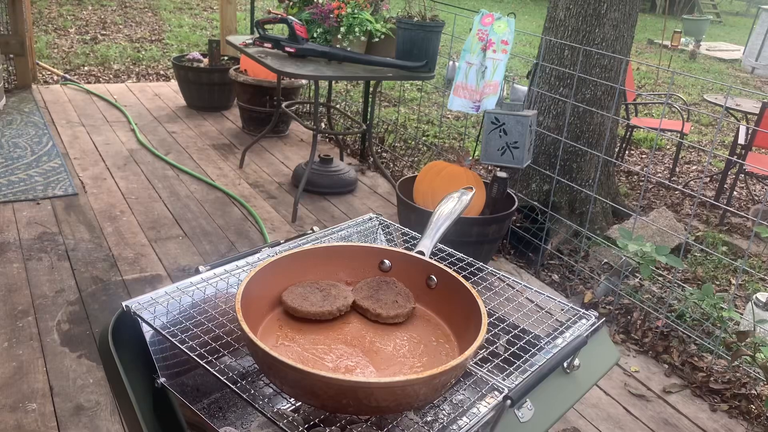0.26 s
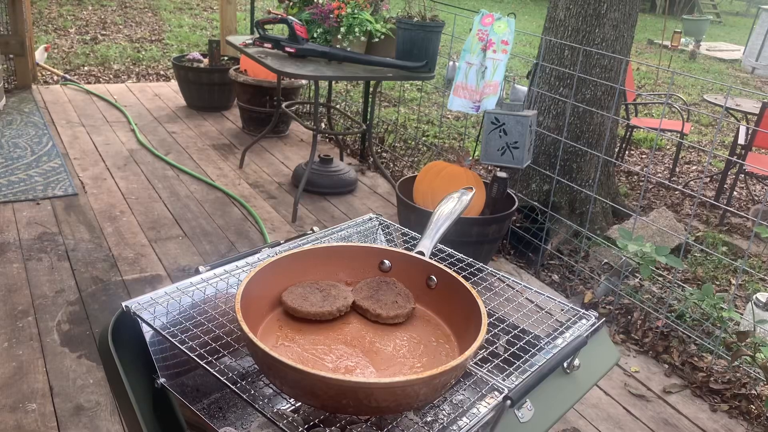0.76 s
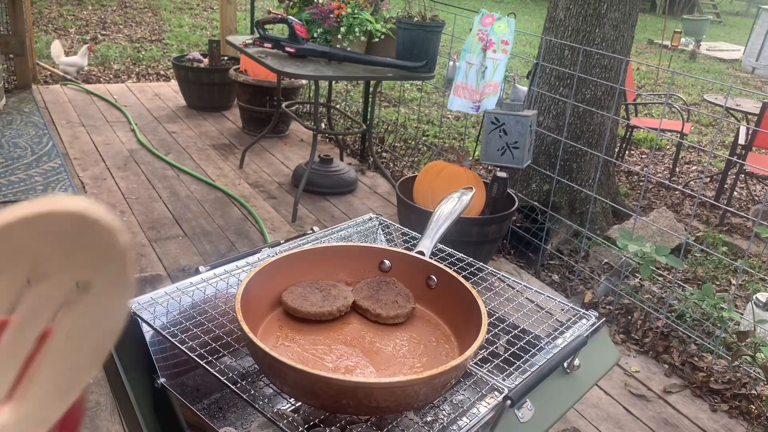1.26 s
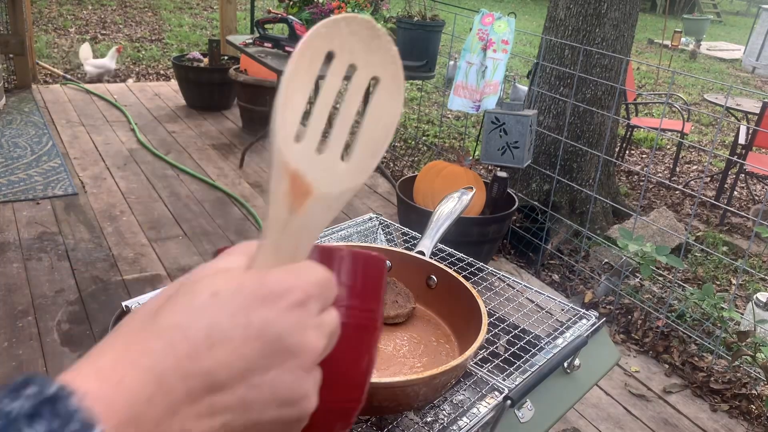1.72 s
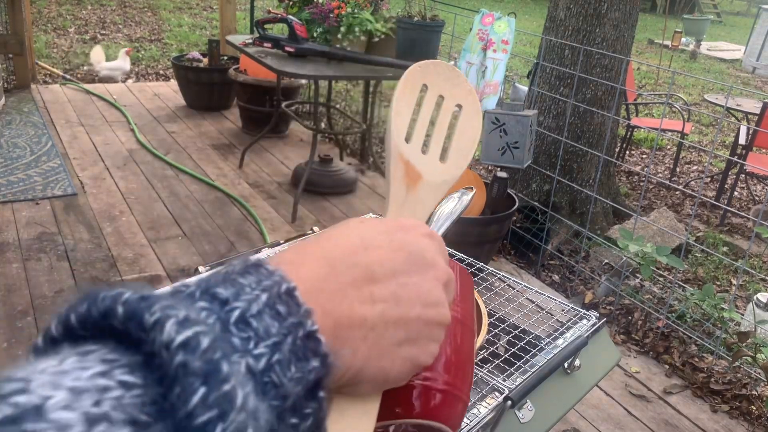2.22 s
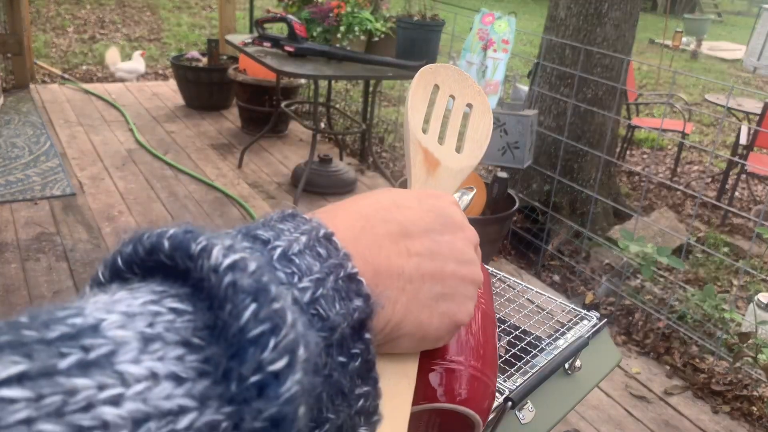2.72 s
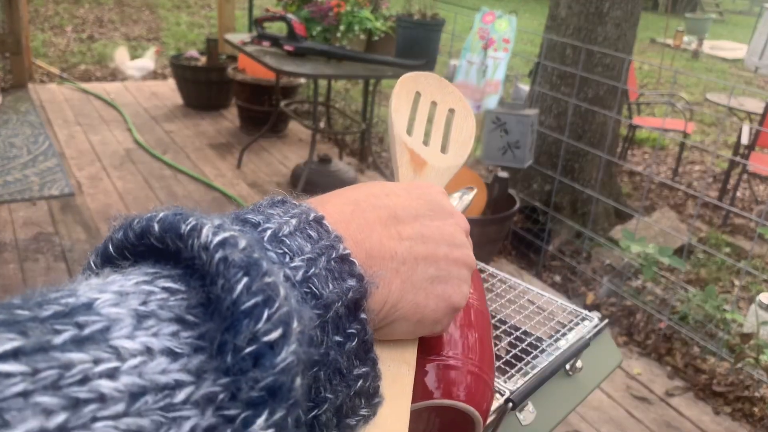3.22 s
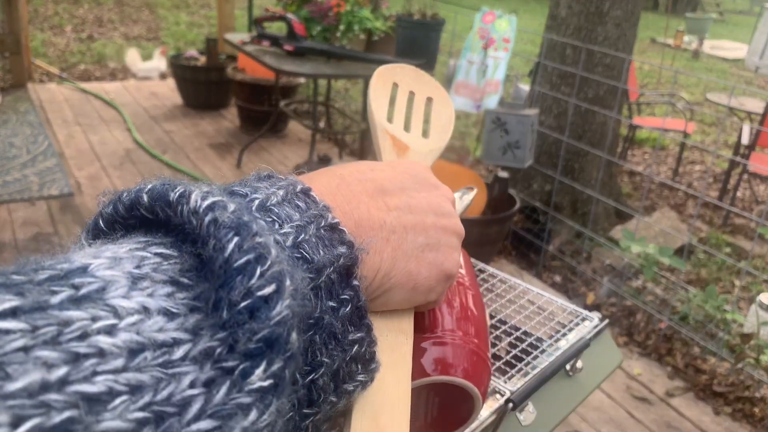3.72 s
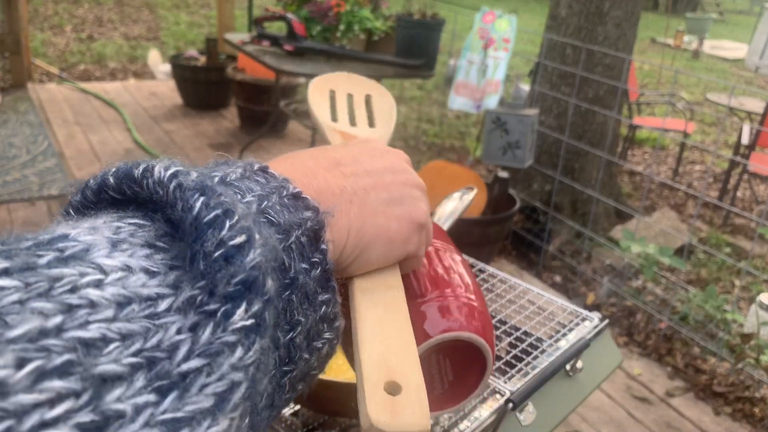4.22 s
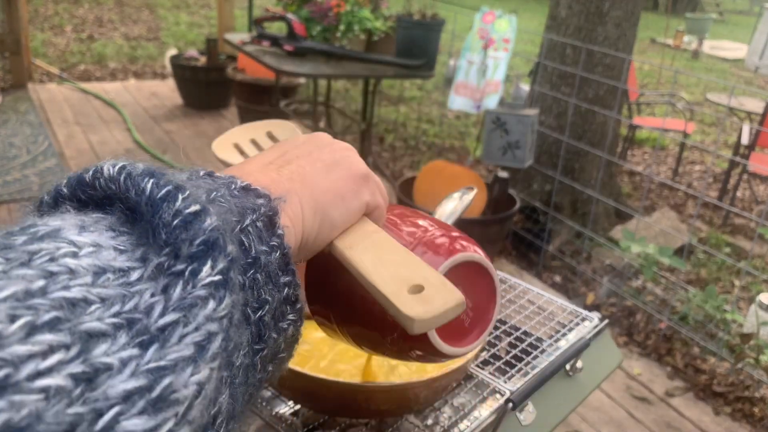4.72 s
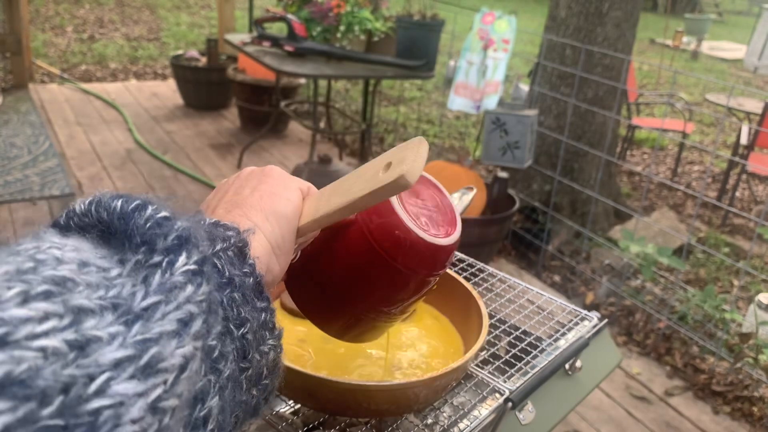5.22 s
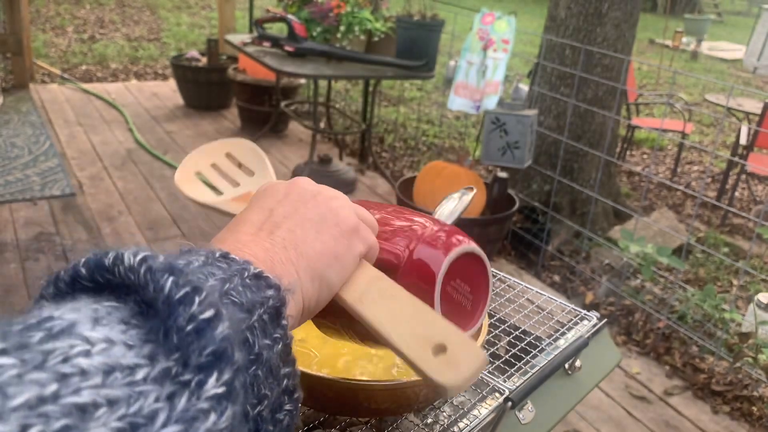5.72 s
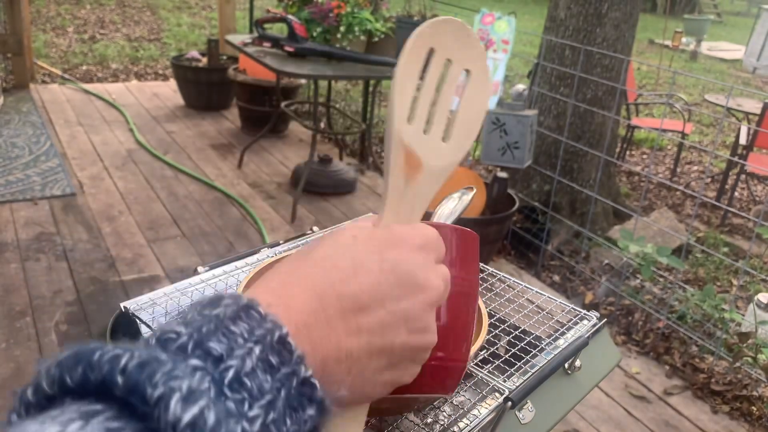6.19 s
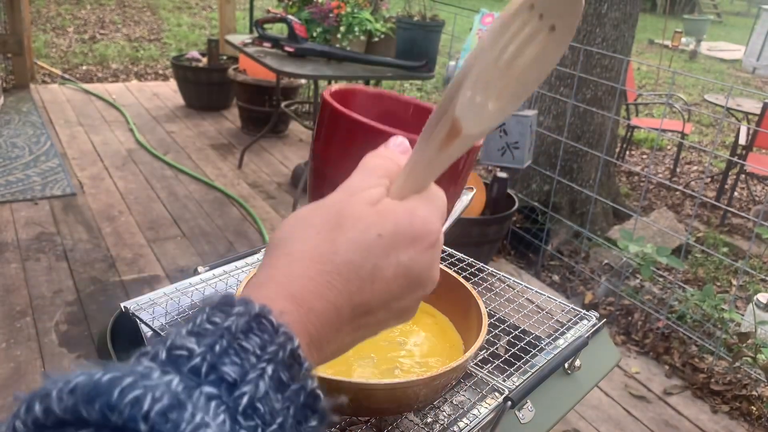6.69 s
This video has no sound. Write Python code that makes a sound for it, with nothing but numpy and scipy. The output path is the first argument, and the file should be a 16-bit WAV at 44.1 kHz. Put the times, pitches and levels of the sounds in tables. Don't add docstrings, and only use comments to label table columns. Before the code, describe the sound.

Low hen moans left and right, cutlery clatter, a spoon strike and a mug knock, then a drawn-out hoarse squawk and quick clucking outdoors.

```python
import sys
import numpy as np
from scipy import signal
from scipy.fft import rfft, irfft
from scipy.io import wavfile
from scipy.ndimage import uniform_filter1d

SR = 44100
rng = np.random.default_rng(int(sys.argv[2]) if len(sys.argv) > 2 else 0)


def magnitude_from_level(level_db):
    exponent = np.asarray(level_db, float) / 20
    return 10 ** exponent


def transcribe(u):
    v = np.clip(np.atleast_2d(u).T, -1, 1)
    q = np.round(v * 32767).astype(np.int16)
    wavfile.write(sys.argv[1], SR, q)


N = 306495
T = np.arange(N) / SR
HZ = np.fft.rfftfreq(N, 1 / SR)

# time_s, pitch_hz, level_db of the strongest partial, roughness (0-1)
LEFT_CALLS = [
    [(0, 357.5, -54, .28), (.14, 363.4, -50.5, .27), (.3, 383.4, -45.5, .1), (.37, 404.6, -49.5, .3),
     (.44, 390.3, -43, .06), (.55, 391, -45, .32), (.7, 393.3, -45, .28), (.76, 373.5, -46.5, .25),
     (.79, 376, -70, 0.35)],
    [(1.02, 342.8, -57, 0.46), (1.06, 348, -52.5, 0.12), (1.17, 350.7, -50.5, 0.24),
     (1.28, 362.5, -54, 0.43), (1.36, 365.5, -66, .4), (1.47, 370, -61, .35)],
    [(6.735, 385, -67, 0.27), (6.77, 384.7, -58, 0.16), (6.95, 394, -57, 0.22)],
]
RIGHT_CALLS = [
    [(0, 377.8, -55.5, .14), (.2, 406.4, -50, .22), (.25, 427, -42.5, 0.066), (.38, 437.1, -44.5, .08),
     (.43, 394, -40, .07), (.47, 392, -41.5, 0.096), (.5, 437.8, -45, 0.16), (.65, 428, -44.5, .13),
     (.775, 445.2, -48, .2)],
    [(1.02, 400, -56, 0.61), (1.09, 362, -53, 0.24), (1.16, 395.5, -47.5, .33), (1.22, 413, -44, .17),
     (1.3, 427.3, -43.5, 0.049), (1.43, 466.3, -39, .12), (1.455, 425, -42.5, .18), (1.5, 401, -53, .2)],
]
SQUAWK_CALLS = [
    [(3.725, 696.5, -56, .55), (3.85, 676, -52.5, 0.36), (3.9, 618, -55, 0.48), (3.97, 592, -50.5, .6),
     (4.12, 576.8, -50, 0.58), (4.3, 593.4, -46, .48), (4.45, 650.4, -44.5, 0.47),
     (4.57, 661.3, -41.5, 0.41), (4.688, 685, -49, 0.69)],
    [(4.699, 676.4, -42.5, .48), (4.78, 638, -48, 0.5), (4.819, 606.4, -57, 0.72)],
]
# time_s, pitch_hz, level_db, roughness
CLUCK_CALLS = [
    [(4.925, 740, -53, .35), (4.975, 720, -52, .4), (4.987, 610, -48, .35), (5.045, 595, -48, .45),
     (5.062, 590, -55, .6)],
    [(5.183, 610, -51, .35), (5.215, 690, -51, .5), (5.248, 690, -51, .5), (5.256, 610, -46, .5),
     (5.335, 600, -46, .6), (5.347, 590, -52, .6)],
    [(5.465, 700, -50, .4), (5.515, 720, -50, .55), (5.528, 640, -47, .55), (5.575, 625, -50, .6),
     (5.595, 600, -55, .6)],
    [(5.697, 700, -50, .45), (5.715, 600, -50, .6), (5.75, 680, -51, .7), (5.79, 620, -45, .55),
     (5.82, 625, -51, .6)],
    [(5.955, 780, -53, .4), (5.98, 790, -52, .6), (5.992, 630, -48, .75), (6.04, 630, -46, .75),
     (6.062, 640, -54, .8)],
    [(6.203, 790, -52, .3), (6.24, 760, -55, .5), (6.25, 650, -47, .65), (6.27, 650, -45, .7),
     (6.298, 670, -51, .75)],
    [(6.456, 720, -56, .6), (6.472, 635, -45, .4), (6.484, 740, -54, .5), (6.52, 760, -52, .45),
     (6.529, 630, -44, .35), (6.565, 610, -47, .5), (6.592, 605, -54, .7)],
    [(6.847, 635, -48, .5), (6.862, 625, -47, .5), (6.87, 625, -55, .7), (6.895, 615, -59, .7)],
]
# time_s, pitch_hz, level_db, roughness
CHIRP_CALL = [
    (3.58, 601, -64, 0.37),
    (3.595, 546, -56, 0.29),
    (3.625, 554, -66, 0.36),
    (3.635, 714, -57, .4),
    (3.66, 642.5, -70, 0.29),
    (3.7, 560, -64, 0.58),
]
FAR_CROW_CALL = [
    (3.02, 760, -72, 0.54),
    (3.1, 800, -72.5, 0.41),
    (3.2, 895, -77, 0.45),
    (3.32, 957, -72.5, 0.41),
    (3.44, 964, -87, 0.25),
    (3.56, 830, -72, 0.36),
]
MURMUR_CALL = [
    (6.57, 262.8, -59, 0.19),
    (6.62, 255.3, -60.5, 0.28),
    (6.66, 262, -60, 0.26),
    (6.69, 271, -55, 0.17),
    (6.74, 295.3, -60, 0.17),
]

# frequency_hz, level_db
LEFT_THROAT = [(200, -8), (280, -14), (340, -2), (400, -8), (800, -6.5), (1170, 4.5), (1600, -17.5),
               (2400, -23), (4000, -29), (5000, -41), (7000, -49), (12000, -88)]
RIGHT_THROAT = [(280, -12), (350, -5), (430, -12), (620, -12.5), (850, 3), (1050, 1), (1300, -2),
                (1500, -14), (1730, -10), (1900, -30), (2400, -40), (3400, -25), (3950, -18), (4600, -22),
                (5200, -30), (7000, -34), (12000, -70)]
THIRD_THROAT = [(400, -16), (640, -5), (800, -5), (1000, -8), (1270, 1.5), (1420, -4), (1650, -9),
                (2100, -20), (2480, -13), (3100, -26), (3750, -17), (4050, -23), (4400, -18), (5400, -32),
                (6500, -16), (15000, -42)]
MURMUR_TRACT = [(270, -2), (540, 0), (800, -5), (1080, -6.5), (1500, -21), (4000, -25)]
FAR_TRACT = [(600, -15), (950, 5), (1400, -6), (1850, 4.5), (2600, -31), (6000, -34)]
# frequency_hz, level_db
SQUAWK_AIR = [(450, -30), (720, -8), (950, -15), (1280, 0), (1700, 0), (2100, -14), (2480, -12),
              (3100, -22), (3900, -17), (5300, -26), (6200, -11), (6900, -9), (7600, -28), (12000, -50)]
CLUCK_AIR = [(450, -22), (620, -9), (850, -5), (1050, -12), (1280, 0), (1480, -3), (1750, -11), (2100, -24),
             (2480, -17), (3200, -30), (3750, -17), (4050, -24), (4350, -17), (5300, -32), (6600, -24),
             (12000, -55)]
# peak_s, peak_db, rise_20db_s, fall_20db_s
BEAK_OPENINGS = [(4.05, -4, .5, .6), (4.5, -1, .8, .8), (4.74, 0, .3, .2), (5.02, -2, .05, .1),
                 (5.31, 0, .12, .15), (5.555, 0, .1, .1), (5.81, -3, .2, .1), (6.02, -2, .1, .2),
                 (6.285, -1, .05, .1), (6.56, -2, .12, .15), (6.87, -5, .06, .2)]

# frequency_hz, level_db
RUMBLE_SPECTRUM = [(25, -31), (40, -2), (60, 6.5), (110, 3), (160, -5), (250, -15.5), (500, -24),
                   (1000, -33.5), (2500, -49), (6000, -40.5)]
RUSTLE_SPECTRUM = [(250, 6), (600, 8), (1500, 5), (2600, 2), (4500, 7.5), (6500, 5.5), (9000, 7.5),
                   (12000, 3), (15800, 9)]
# peak_s, peak_db, half_width_s
BREEZE_GUSTS = [
    (1.55, -53.5, .1),
    (1.76, -50.5, .05),
    (2.03, -47, 0.11),
    (2.32, -50, .06),
    (2.83, -44, .05),
    (6.75, -55, .15),
]
# peak_s, peak_db, rise_20db_s, fall_20db_s
SLEEVE_STROKES = [(.32, -52, .025, 0.07), (.4, -56, 0.2, 0.4), (.68, -53, 0.16, 0.2),
                  (.75, -51, 0.08, 0.06), (1.28, -51, 0.23, .45), (1.47, -58, 0.2, .2),
                  (2.33, -50, 0.09, 0.34), (3.67, -63, .05, 1.5), (3.99, -58, .2, 0.1),
                  (4.76, -58, 0.84, .35), (5.36, -65, .3, 0.6), (5.57, -61.5, 0.6, 0.36),
                  (5.71, -64.5, 0.4, 1)]
SLEEVE_SPITS = [(.02, -55.5, 0.06, 0.11), (.52, -51.5, .1, 0.12), (.87, -51, 0.012, .5),
                (.99, -52, .5, 0.11), (1.12, -50.5, .05, 0.41), (1.54, -54, .12, 0.28),
                (1.62, -51, .08, .1), (1.7, -49.5, .3, .12), (1.8, -57.5, .3, 0.34), (2.1, -66, .08, 0.43),
                (2.63, -60, .04, 0.038), (2.75, -57.5, 0.043, .07), (2.86, -61.5, 0.037, .5),
                (2.96, -57.5, .4, 0.3), (3.3, -61, .04, .45), (3.8, -63, .2, .4), (4.2, -57, 0.29, 0.42),
                (5.97, -55.5, .4, .12)]

# start_s, level_db, mode_hz, t60_s
BOARD_THUDS = [
    (.002, -38, 185, .2),
    (1.715, -38, 175, .1),
    (1.863, -40, 170, .09),
    (2.04, -43, 200, .12),
    (2.78, -53, 475, .45),
    (2.788, -36, 290, .12),
    (2.792, -25, 100, .17),
    (2.796, -33, 180, .16),
    (2.84, -43, 240, .22),
    (2.9, -57, 460, .3),
]
# start_s, level_db
TICK_BLOWS = [(0.0149, -50), (0.0514, -36), (.1221, -56), (.2229, -54), (0.8654, -42), (1.1149, -48),
              (1.2625, -46), (1.6212, -47), (2.5915, -54), (2.627, -40), (2.7247, -54), (2.8579, -53),
              (3.2919, -59)]
CLATTER_BLOWS = [
    (.302, -43),
    (.311, -26.5),
    (.316, -33),
    (.324, -27),
    (.334, -33),
    (.345, -39),
    (.358, -42),
    (.372, -46),
]
SPOON_HITS = [
    (.7472, -24),
    (.749, -20.5),
    (.762, -42),
]
TABLE_TAPS = [
    (.926, -46),
    (2.04, -55.5),
]
MUG_HITS = [
    (2.2292, -28),
    (2.2315, -38.5),
    (2.293, -54),
    (2.358, -56),
]
# frequency_hz, level_db, t60_s
CUTLERY_MODES = [(1610, -2, .03), (2100, -6, .03), (2620, -5, .03), (3210, -6, .04), (3900, -4, .045),
                 (4190, -4, .03), (4570, -6, .03), (6380, -12, .02)]
SPOON_MODES = [(2030, -7, .02), (2519, 0, .026), (3200, -12, .015), (4538, -9, .017), (6300, -11, .008),
               (270, -21, .06), (520, -26, .03), (1300, -20, .02)]
TAP_MODES = [(497, 1.5, 0.045), (655, -2, 0.023), (1020.3, 1, 0.031), (1463, -7, 0.025),
             (1730, -6.5, 0.061), (2580, -2, 0.021)]
MUG_MODES = [(330, -17, .3), (480, -10, .05), (673, -5, .09), (820, -7, .06), (971, -4, .12),
             (955, -21, .5), (1180, -9, .05), (1540, -3, .06), (1790, 3, .06), (2500, -17, .02),
             (3600, -23, .04)]


def shape_db(points, hz):
    point_hz, level_db = np.transpose(points)
    return np.interp(np.log(hz + 1), np.log(point_hz), level_db)


def unit(x):
    return x / np.sqrt(np.mean(x ** 2))


def coloured(points):
    white = rfft(rng.standard_normal(N))
    return unit(irfft(white * magnitude_from_level(shape_db(points, HZ)), N))


def spread(points, alike):
    shared = coloured(points) * np.sqrt((1 + alike) / 2)
    opposed = coloured(points) * np.sqrt((1 - alike) / 2)
    return shared + opposed * np.array([[1], [-1]])


def walk(rate_hz, size=N):
    width = max(int(SR / rate_hz), 2)
    smooth = uniform_filter1d(rng.standard_normal(size), width)
    return unit(uniform_filter1d(smooth, width))


def flutter(rate_hz, size=N):
    quick = walk(rate_hz, size)
    return unit(quick - uniform_filter1d(quick, int(5 * SR / rate_hz)))


def swells(events):
    peak_s, peak_db, rise_s, fall_s = np.transpose(events)[:, :, None]
    t = T[::64]
    drop_db = 20 * np.maximum((peak_s - t) / rise_s, (t - peak_s) / fall_s)
    return np.interp(T, t, np.sum(magnitude_from_level(2 * (peak_db - drop_db)), axis=0))


def hen(calls, throat, air, wobble, throb_db, breath_db, rattle_hz):
    gate = 0
    for call in calls:
        inside_s = np.minimum(T - call[0][0] + 0.004, call[-1][0] - T)
        gate = gate + np.clip(inside_s / 0.0057, 0, 1)
    on = gate > 0
    n = on.sum()
    time_s, pitch_hz, level_db, rough = np.concatenate(calls).T
    pitch_hz = np.interp(T[on], time_s, pitch_hz)
    level_db = np.interp(T[on], time_s, level_db)
    rough = np.interp(T[on], time_s, np.clip(rough, .12, 1))
    pitch_hz = pitch_hz * (1 + wobble * rough * (flutter(56, n) + 0.97 * flutter(245, n)))
    phase = 2 * np.pi * np.cumsum(pitch_hz) / SR

    flap = np.cumsum(rattle_hz * (1 + 0.33 * walk(30.1, n))) / SR % 1
    chop = uniform_filter1d(1.5 - 3 * flap, 60)
    throb = rough * throb_db * (0.29 * flutter(79, n) + chop)

    slip = .16 * flutter(220, n)
    buzz = 0
    for k in range(1, 22):
        own_depth_db = rough * throb_db * min(0.13 * k, 1.5) + .6 * k
        own_db = min(0.91 * k + 0.26, 1) * throb + own_depth_db * flutter(94, n)
        partial = np.sin(k * phase + k * k + max(k - 3, 0) * slip)
        buzz = buzz + magnitude_from_level(6.2 * np.tanh(own_db / 9)) * partial

    effort = gate[on] * magnitude_from_level(level_db)
    voiced, puffs = np.zeros((2, N))
    voiced[on] = effort * buzz
    puff_gain = magnitude_from_level(breath_db + 8 * np.tanh(throb / 8))
    puffs[on] = effort * (1 + .5 * np.cos(phase)) * puff_gain * rough
    tone = np.sqrt(2) * rfft(voiced) * magnitude_from_level(shape_db([(120, -60)] + throat, HZ))
    air_shape = unit(magnitude_from_level(shape_db([(100, -53)] + air, HZ)))
    breath = rfft(puffs * rng.standard_normal(N)) * air_shape
    return irfft(tone + breath, N)


def left_hen():
    moans = hen(LEFT_CALLS, LEFT_THROAT, LEFT_THROAT, wobble=0.068, throb_db=17, breath_db=7, rattle_hz=99.7)
    murmur = hen([MURMUR_CALL], MURMUR_TRACT, MURMUR_TRACT, wobble=0.085, throb_db=7, breath_db=4, rattle_hz=79)
    return moans + murmur


def right_hen():
    return hen(RIGHT_CALLS, RIGHT_THROAT, RIGHT_THROAT, wobble=0.056, throb_db=23, breath_db=3, rattle_hz=108.4)


def rumble():
    steady_db = -55
    power = magnitude_from_level(2 * steady_db)
    for peak_s, peak_db, width_s in BREEZE_GUSTS:
        power = power + magnitude_from_level(2 * peak_db) * np.exp(-((T - peak_s) / width_s) ** 2)
    unrest_db = 1.2 * flutter(20) + 1.14 * flutter(6.2)
    bass = spread(RUMBLE_SPECTRUM, .9) * np.sqrt(power) * magnitude_from_level(unrest_db)
    return bass * magnitude_from_level(np.array([[.9], [-.9]]))


def rustle():
    still_db = -77.5
    stroke_tilt_db, spit_tilt_db, still_tilt_db = 4.5, -4, 11.5
    strokes, spits, still = swells(SLEEVE_STROKES), swells(SLEEVE_SPITS), magnitude_from_level(2 * still_db)
    grain_db = 1.52 * walk(17.6) + 1.05 * walk(450) + 5.5
    hiss = spread(RUSTLE_SPECTRUM, -0.079) * magnitude_from_level(grain_db)
    middle = signal.sosfilt(signal.butter(2, 5000, fs=SR, output="sos"), hiss)
    treble_power = strokes + spits + still
    middle_power = strokes * magnitude_from_level(2 * stroke_tilt_db) + spits * magnitude_from_level(2 * spit_tilt_db) + still * magnitude_from_level(2 * still_tilt_db)
    treble = np.sqrt(treble_power) * (hiss - middle)
    return treble + np.sqrt(middle_power) * middle * magnitude_from_level(1.2 * flutter(12))


def thuds():
    out = 0
    for start_s, level_db, mode_hz, t60_s in BOARD_THUDS:
        t = np.clip(T - start_s, 0, None)
        swell = 1 - np.exp(-t / .005)
        out = out + magnitude_from_level(level_db - 60 * t / t60_s) * swell * np.sin(2 * np.pi * mode_hz * t)
    return out


def struck(blows, modes, crack_db, scatter_db, contact_s):
    out, t = np.zeros(N + SR), T[:SR // 2]
    mode_hz, mode_db, t60_s = np.transpose(modes)[:, :, None]
    for start_s, blow_db in blows:
        spot_db = scatter_db * rng.standard_normal(mode_db.shape)
        turn = rng.random(mode_db.shape)
        grit_db = 45 * uniform_filter1d(rng.standard_normal((len(modes), len(t))), 130)
        decay = magnitude_from_level(mode_db + spot_db + grit_db - 60 * t / t60_s)
        ring = np.sum(decay * np.sin(2 * np.pi * (mode_hz * t + turn)), axis=0)
        crack = np.gradient(rng.standard_normal(len(t))) * magnitude_from_level(crack_db - 60 * t / 0.0025)
        first = int(start_s * SR)
        out[first:first + len(t)] += magnitude_from_level(blow_db) * (ring * (1 - np.exp(-t / contact_s)) + crack)
    return out[:N]


def ticks():
    modes = [(6870, -8, 0.008), (11080, -4, 0.008)]  # frequency_hz, level_db, t60_s
    return struck(TICK_BLOWS, modes, 4, scatter_db=2, contact_s=0.00032)


def cutlery_and_spoon():
    cutlery = struck(CLATTER_BLOWS, CUTLERY_MODES, -9, scatter_db=3, contact_s=.004)
    return cutlery + struck(SPOON_HITS, SPOON_MODES, 1, scatter_db=1, contact_s=.0006)


def taps_and_mug():
    taps = struck(TABLE_TAPS, TAP_MODES, -20, scatter_db=1, contact_s=.002)
    return taps + struck(MUG_HITS, MUG_MODES, -40, scatter_db=1, contact_s=.001)


def far_crow():
    return hen([FAR_CROW_CALL], FAR_TRACT, FAR_TRACT, wobble=0.045, throb_db=13, breath_db=8.5, rattle_hz=71.1)


def third_hen():
    squawk = hen([CHIRP_CALL] + SQUAWK_CALLS, THIRD_THROAT, SQUAWK_AIR,
                 wobble=0.0453, throb_db=8.5, breath_db=3, rattle_hz=90.1)
    clucks = hen(CLUCK_CALLS, THIRD_THROAT, CLUCK_AIR, wobble=.07, throb_db=13, breath_db=-2, rattle_hz=90)
    return beak(squawk + .87 * clucks)


def beak(voice):
    shut_db, split_hz = -12, 2800
    top = signal.sosfilt(signal.butter(2, split_hz, "highpass", fs=SR, output="sos"), voice)
    low = signal.sosfilt(signal.butter(2, split_hz, fs=SR, output="sos"), voice)
    return low - top * np.sqrt(magnitude_from_level(2 * shut_db) + swells(BEAK_OPENINGS))


def ports(x, lag_ms, low_db, high_db):
    pan_db = shape_db([(800, low_db), (1200, high_db), (3000, 0.0044)], HZ)
    half = magnitude_from_level(pan_db / 2) * np.exp(-1j * np.pi * HZ * lag_ms / 1000)
    return irfft(rfft(x) * np.array([half, 1 / half]), N)


def yard(x, wet_db):
    t60_s, first_echo_s = .22, .012
    t = T[:SR // 2]
    tail = rng.standard_normal((2, len(t))) * magnitude_from_level(-60 * t / t60_s) * (t > first_echo_s)
    tail = signal.sosfilt(signal.butter(2, [850, 4500], "bandpass", fs=SR, output="sos"), tail)
    tail = tail / np.sqrt(np.sum(tail ** 2, axis=1, keepdims=True))
    return magnitude_from_level(wet_db) * signal.fftconvolve(x[None], tail, axes=1)[:, :N]


def scene():
    left, right, third, far = left_hen(), right_hen(), third_hen(), far_crow()
    metal, mug = cutlery_and_spoon(), taps_and_mug()
    hens = ports(left, .2, 2, 5) + ports(right + far, .3, -6, -4) + ports(third, -.22, 3, 6)
    near = ports(mug, -0.093, 1.6, 2.2) + ports(metal, 0.036, .1, .1)
    near = near + ports(ticks() + thuds(), 0.011, 5.2, .1)
    echoes = yard(.7 * (left + right) + third + far, -15) + yard(mug, -24) + yard(metal, -27.5)
    return hens + near + echoes + rustle() + rumble()


def roll_off(x):
    return signal.sosfilt(signal.butter(12, 17110, fs=SR, output="sos"), x)


def record(dry):
    left, right = rfft(dry)
    share = np.clip((HZ - 5200) / 2200, 0, .995)
    turn = np.pi * (1 + (HZ - 8550) / 2480)
    lagged = left * np.exp(1j * (turn - 0.13 * np.sin(2 * turn)))
    right = share * lagged + np.sqrt(1 - share ** 2) * right
    treble_limit = np.clip((15850 - HZ) / 120, 0, 1)
    mix = irfft(np.array([left, right]) * treble_limit, N)
    return roll_off(mix)


dry = scene()
out = record(dry)
transcribe(out)
```